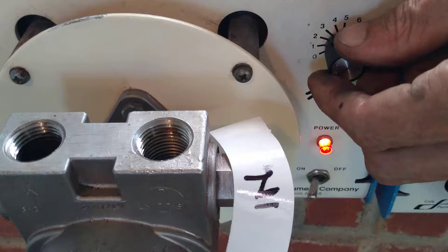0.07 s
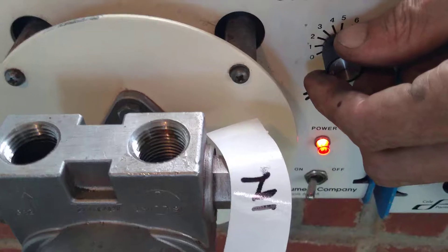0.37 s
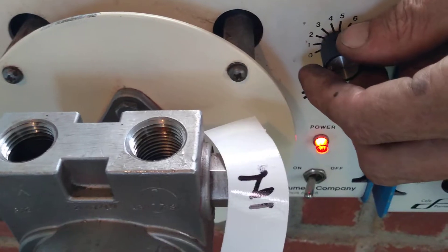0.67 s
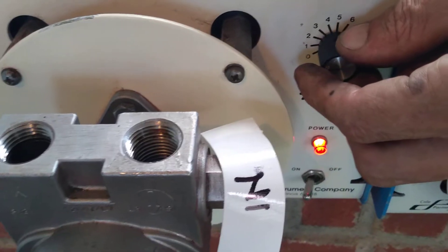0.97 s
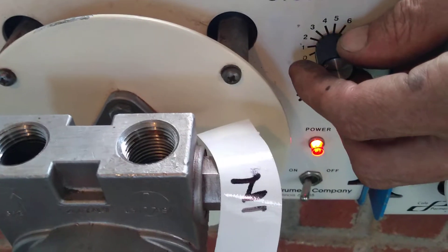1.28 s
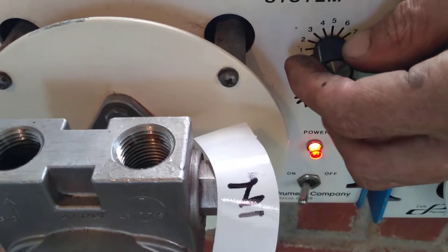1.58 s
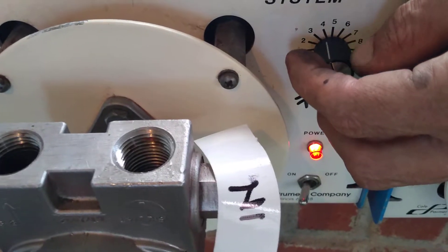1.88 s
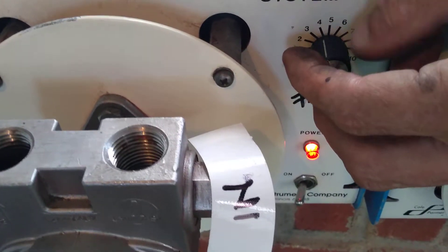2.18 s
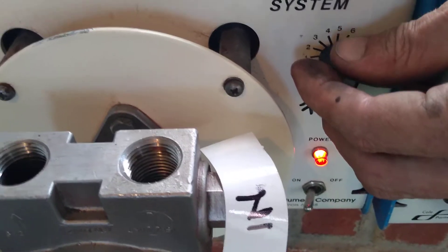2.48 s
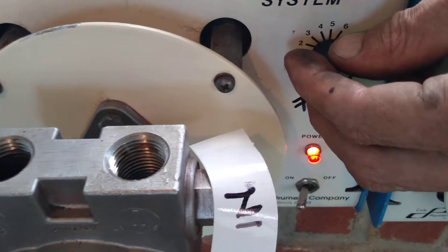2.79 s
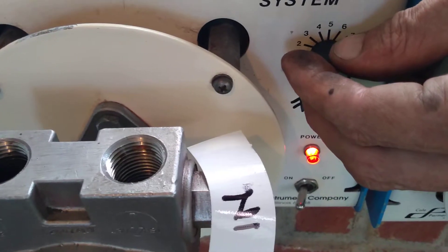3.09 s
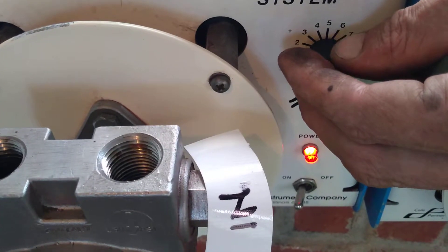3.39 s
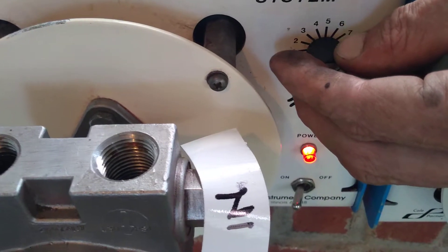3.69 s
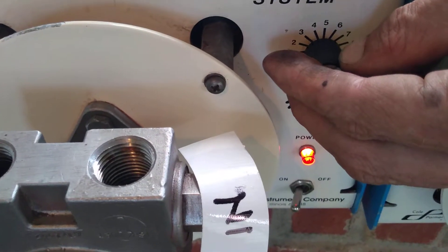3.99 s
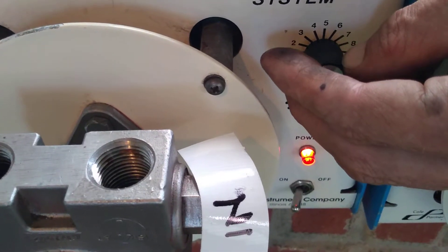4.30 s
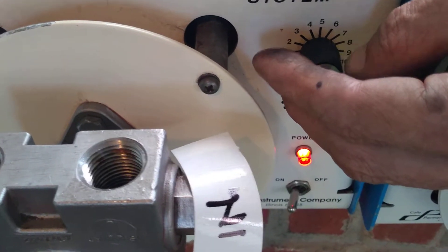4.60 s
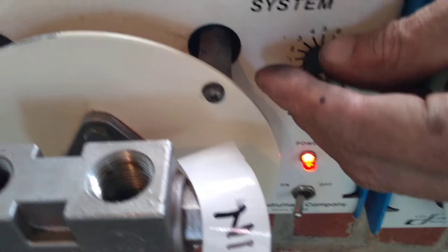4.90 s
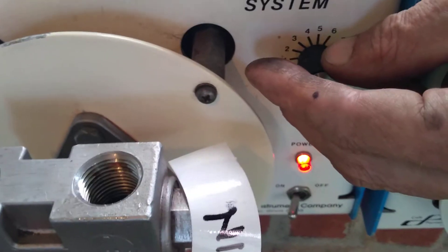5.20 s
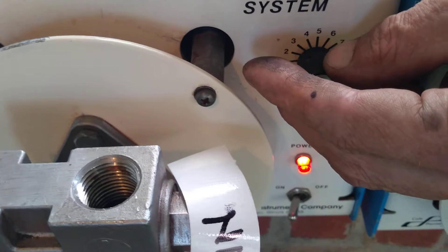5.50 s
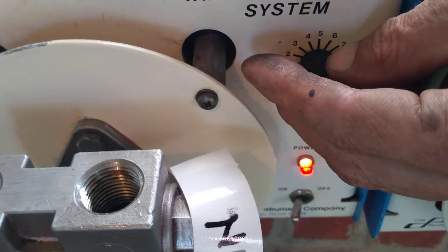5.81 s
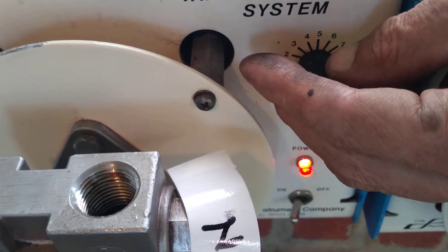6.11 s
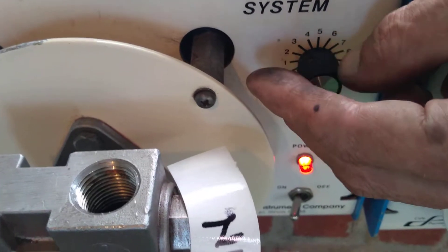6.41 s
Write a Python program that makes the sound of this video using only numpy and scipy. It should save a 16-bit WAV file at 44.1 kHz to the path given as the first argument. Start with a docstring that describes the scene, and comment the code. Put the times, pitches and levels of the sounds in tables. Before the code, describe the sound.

Heard up close in a workshop, a pump motor hums and buzzes, then slowly begins turning. Its rotor scrapes and chatters in the housing while the vanes tick, squeak briefly and knock against the casing. With rising speed the knocks thin out and the clicking becomes a fast, bright, louder mechanical rattle. A slight whine and a faint rumble from the bench lie underneath, and the pump keeps running.

```python
"""A small vane pump in a workshop, close by, while its speed dial is turned up.
The motor first hums on the chopped mains; the coupling bumps, the shaft creeps, then speeds up to
about 29 turns a second. The rotor rubs and chatters in its housing. The vanes click, crackle,
squeak and now and then knock the casing. At speed the armature slots whine; the bench rumbles below."""
import sys
import numpy as np
from scipy import signal
from scipy.fft import rfft, irfft
from scipy.io import wavfile
from scipy.ndimage import uniform_filter1d

SR = 44100
rng = np.random.default_rng(int(sys.argv[2]) if len(sys.argv) > 2 else 0)


def output_pcm(signal):
    """Save a mono or channel-first signal as 16-bit PCM at the path in sys.argv[1].

    Samples are clipped to [-1, 1] before scaling.
    """
    pcm = np.clip(np.atleast_2d(signal).T, -1, 1) * 32767
    wavfile.write(sys.argv[1], SR, np.round(pcm).astype(np.int16))


N = 293265
T = np.arange(N) / SR
HZ = np.fft.rfftfreq(N, 1 / SR)
HALF_SPEED_RPS, CRITICAL_RPS = 15, 8.74  # rps: shaft turns a second
ENGAGE_S = 1.042


def amp(db):
    return 10 ** (np.asarray(db) / 20)


def unit(x):
    return x / np.sqrt(np.mean(x ** 2) + 1e-20)


def steady(x):
    """Holds the slow level at 1."""
    return x / np.sqrt(uniform_filter1d((x ** 2).mean(0), 6000) + 1e-12)


def curve(rows, column=1, at=T):
    """A table column, interpolated over the first."""
    rows = np.array(rows)
    return np.interp(at, rows[:, 0], rows[:, column])


def spectrum(points):
    """A table interpolated over log frequency."""
    hz, value = np.transpose(points)
    return np.interp(np.log(HZ + 1), np.log(hz), value)


def add(mix, start_s, sound):
    part = mix[:, max(round(start_s * SR), 0):][:, :sound.shape[-1]]
    part += sound[..., :part.shape[1]]


def drift(rate_hz, size=32768):
    """Slow noise of rms 1."""
    hz = np.arange(size // 2 + 1) / T[-1]
    slow = irfft(rfft(rng.standard_normal(size)) / (1 + (hz / rate_hz) ** 4))
    return np.interp(T, np.linspace(0, T[-1], size), unit(slow))


def modes(rows, at=HZ):
    """Gain of resonances with steep skirts."""
    return np.sqrt(sum(amp(db) ** 2 / (1 + ((at - hz) / width) ** 2) ** 2 for hz, width, db in rows))


def colour(x, gain):
    """Minimum-phase filter that keeps the power of white noise."""
    cepstrum = irfft(np.log(np.maximum(unit(gain), 1e-4)), N)
    cepstrum[1:N // 2] *= 2
    cepstrum[N // 2:] = 0
    return irfft(rfft(x) * np.exp(rfft(cepstrum)), N)


def resonate(drive, rows, lifts_db):
    """Drives resonances; lifts_db maps a row index to its gain curve."""
    whole = modes(rows)
    body = colour(drive, whole)
    bins = rfft(body)
    return body + sum((amp(db) - 1) * irfft(bins * (modes([rows[i]]) / whole) ** 2, N)
                      for i, db in lifts_db.items())


# Shaft run-up: time_s, speed_rps
SHAFT_SPEED = [(1.0, 1.475), (2.0, 6.007), (3.0, 12.202), (3.5, 14.482), (4.0, 17.529), (4.5, 21.37),
               (4.75, 22.416), (5.0, 23.065), (5.25, 24.344), (5.5, 26.31), (6.0, 27.7), (6.3, 28.2),
               (6.66, 28.55)]
def shaft_rps(at=T):
    return curve(SHAFT_SPEED, at=at)


def shaft_turns():
    return np.cumsum(shaft_rps()) / SR


# Motor load, up as the rotor binds, down as it comes free: time_s, load_db
MOTOR_LOAD = [(.8, -13.5), (1.04, -4), (1.09, -2), (1.5, 0), (1.9, 1.5), (3.0, 0.5), (3.35, 0), (3.55, 2),
              (3.65, -0.5), (3.8, 0.94), (3.9, -3), (4.35, -1.5), (4.64, -1), (4.73, -4), (5.2, -1.5),
              (5.5, -1.5), (5.56, -4.5), (6.0, -1.5), (6.1, -3), (6.52, -2.5), (6.64, -1)]
def load_db():
    return curve(MOTOR_LOAD)


def mains_lines(rows, waver_db, spread_rad, chop_hz=120):
    """Wavering harmonics of the chopped mains; their phases are spread, softening the buzz's pulse."""
    out = np.zeros((2, N))
    shake = np.clip(shaft_rps() / CRITICAL_RPS, 0.6, 1)
    for harmonic, db, side_db, lead_rad in rows:
        k = round(harmonic)
        phase = 2 * np.pi * k * chop_hz * T + spread_rad * k ** 2 + 0.18 * shake * drift(11)
        tone = np.sqrt(2) * np.cos(phase + np.array([[0], [lead_rad]]))
        pan_db = side_db * np.array([[1], [-1]]) / 2
        out += tone * amp(db + waver_db * shake * drift(13) + pan_db)
    return out


# Hum of frame and panel: harmonic, level_db, left_minus_right_db, right_lead_rad
FRAME_HARMONICS = [(2, 1.5, 1.5, 1.4), (3, -11.5, -4, 1.12), (4, -24.5, 12, 1.2), (5, -18.5, -1, 1.1),
                   (6, -23.5, -4, 1.1), (7, -12, -1.5, 0), (8, -21, -8, 0)]
PANEL_HARMONICS = [(9, -13, 2, -6), (10, -18, 3, -6.5), (11, -28, -35, -3.5), (12, -25, 0, 0),
                   (13, -5, 0.5, 1), (14, -2, 3.5, 1), (15, -30.5, 24, -27), (16, -21.5, 7, -0.5)]
# Hum balance during run-up: time_s, frame_db, panel_db, stator_db
HUM_BALANCE = [(.12, -13, -32, -6), (.45, -6, -31, 4), (.78, -6.5, -15, 0), (.88, -11, -3.5, -2),
               (.96, -4, -5, -1), (1.05, -8.5, -6, -8), (1.07, 1.5, -2.5, -7), (1.22, -0.5, -1.5, -5),
               (1.33, 1, -1.5, -1), (1.5, -1.5, -2.5, -1.5), (1.75, -2, -0.5, -0.5), (3.0, 4.5, 0, 1),
               (4.0, 0, 6, 1), (4.6, 0.5, 2, 1.5), (6.1, 2, 2, 0.5)]
def hum():
    """The mains shakes stator, frame and panel: louder with load, fainter with speed."""
    stator = mains_lines([(1, 0.43, -5.5, 1.48)], waver_db=1.5, spread_rad=0)
    frame = mains_lines(FRAME_HARMONICS, waver_db=1.5, spread_rad=1.4)
    panel = mains_lines(PANEL_HARMONICS, waver_db=3, spread_rad=0.0787)
    stator *= amp(-49 - 0.27 * shaft_rps() + curve(HUM_BALANCE, 3))
    frame *= amp(-41 - 0.31 * shaft_rps() + curve(HUM_BALANCE, 1))
    panel *= amp(-48 - 0.6 * shaft_rps() + curve(HUM_BALANCE, 2))
    return (stator + frame + panel) * amp(load_db())


# Bench resonances: pitch_hz, width_hz, gain_db
BENCH_MODES = [(55.7, 3.8, -8), (90.8, 4.3, 0), (137, 48, -15.5)]
# Bench shaking: time_s, level_db
BENCH_LEVEL = [(0.1, -63), (0.46, -58), (1.5, -58), (3.0, -55.5), (6.65, -68)]
def rumble(gain_db=-0.5):
    """The bench shakes at its low resonances."""
    shaking = colour(rng.standard_normal((2, N)), modes(BENCH_MODES))
    return steady(shaking) * amp(curve(BENCH_LEVEL) + gain_db)


def microphone_hiss(level_db=-69.5, corner_hz=9000):
    """Faint bright self-noise of each port."""
    return colour(rng.standard_normal((2, N)), HZ / np.hypot(HZ, corner_hz)) * amp(level_db)


# Tight spot of each turn: time_s, angle_turns, swing_db
TIGHT_SPOT = [(1.5, 0.32, 11), (2, 0.17, 1), (2.6, 0.21, 0), (3.8, 0.38, 2.5), (4.8, 0.36, 4),
              (5.3, 0.27, -1.5), (5.55, 0.78, -1.5), (6.65, 0.76, 3)]
def tightness_db():
    """The contact tightens and eases once a turn."""
    return curve(TIGHT_SPOT, 2) * np.cos(2 * np.pi * (shaft_turns() - curve(TIGHT_SPOT)))


def friction(repeat_share, swing, grit_db, grain_hz, bumps_db, mark_count=512, bump_count=40):
    """Surface marks that return on each turn plus fresh grit, hardest at the tight spot."""
    turns = shaft_turns()
    moving = np.clip((T - 1.2) / 0.66, 0, 1)
    surface = rng.standard_normal(mark_count)
    surface = surface + 0.89 * np.roll(surface, mark_count // 2)  # opposite vanes pass the same marks
    height = np.interp(turns, np.arange(mark_count) / mark_count, surface, period=1)
    marks = np.diff(height, prepend=0)
    marks /= np.sqrt(uniform_filter1d(marks ** 2, 4096) + 1e-12)
    bump_heights = unit(rng.standard_normal(bump_count))
    bumps = np.interp(turns, np.arange(bump_count) / bump_count, bump_heights, period=1)
    force = amp(moving * (swing * tightness_db() + bumps_db * bumps + grit_db * drift(grain_hz)))
    force /= np.sqrt(uniform_filter1d(force ** 2, 6000))
    share = repeat_share * moving * shaft_rps() / max(rps for _, rps in SHAFT_SPEED)
    return force * (np.sqrt(1 - share) * rng.standard_normal((2, N)) + np.sqrt(share) * marks)


def rub_gain(half_speed_db, doubling_db, load_factor, idle_db):
    """Rubbing grows with speed and load, above a faint idle noise."""
    doublings = np.log2(shaft_rps() / HALF_SPEED_RPS)
    return np.hypot(amp(half_speed_db + doubling_db * doublings + load_factor * load_db()), amp(idle_db))


ROTOR_GAIN = rub_gain(half_speed_db=-42, doubling_db=6, load_factor=2, idle_db=-68.5)
CONTACT_GAIN = rub_gain(half_speed_db=-45.5, doubling_db=6.5, load_factor=1.7, idle_db=-68.5)

# Contact noise spectrum: frequency_hz, gain_db
CONTACT_SPECTRUM = [(4400, 4), (4950, 3), (5150, 5), (5650, 2.5), (6050, 3.5), (7300, 3.5), (8300, 0.5),
                    (8850, 2), (10300, -3), (11300, 0), (12600, -3.5), (14200, -7)]
def contact_colour(x, low_cut_hz=4300):
    """The bright tone of metal contact."""
    return colour(x, amp(spectrum(CONTACT_SPECTRUM)) / np.sqrt(1 + (low_cut_hz / (HZ + 1)) ** 16))


# Pump resonances: pitch_hz, width_hz, gain_db
BASE_MODES = [(200, 52, -9.5), (272, 73, -0.5), (426, 49, 2.5), (573.3, 46, 1.5), (717, 93, -1)]
CASING_MODES = [(932, 97, -5), (1006, 57, -0.5), (1103, 35, -3.5), (1231, 66, -8), (1510, 230, -15),
                (1628, 47, -4), (1820, 34, -4.5)]
ROTOR_MODES = [(2640, 1750, -22), (2456, 235, 0), (2700, 190, -14), (2842, 27, -1.5), (2975, 260, -5.5),
               (3229, 62, -1.5), (3510, 150, -5), (3787, 49, 2.5)]
# Resonance lift by speed: speed_rps, base_573hz_db, casing_1006hz_db, casing_1231hz_db
MODE_LIFTS = [(1.5, -5, -14.5, 1), (4.93, 0, 2, -1), (8.9, 0, 8.5, -4), (12.3, 6, -1, -1),
              (14.7, 7, -4, -1.5), (17.4, 6, -3, -0.5), (21.4, 8, -2, 2), (23.8, 6, -6.5, 4),
              (29.08, 1, -0.5, 8)]
def rubbing(critical_db=6, critical_width_rps=4.6):
    """The rubbing rotor shakes the base, the casing and itself, and hisses at the contact."""
    rps = shaft_rps()
    drive = friction(repeat_share=0.003, swing=0.5, grit_db=0, grain_hz=90, bumps_db=4.5, mark_count=64)
    base = steady(resonate(drive, BASE_MODES, {3: curve(MODE_LIFTS, 1, rps)}))
    base *= rub_gain(half_speed_db=-48.5, doubling_db=4, load_factor=2, idle_db=-62.5)

    drive = friction(repeat_share=0.02, swing=0.59, grit_db=0.5, grain_hz=110, bumps_db=2, mark_count=128)
    lifts_db = {1: curve(MODE_LIFTS, 2, rps), 3: curve(MODE_LIFTS, 3, rps)}
    casing = steady(resonate(drive, CASING_MODES, lifts_db))
    casing *= rub_gain(half_speed_db=-41.5, doubling_db=5.5, load_factor=1.5, idle_db=-66.5)
    casing *= amp(critical_db * np.exp(-((rps - CRITICAL_RPS) / critical_width_rps) ** 2))

    drive = friction(repeat_share=0.1, swing=0.41, grit_db=2, grain_hz=230, bumps_db=2.5)
    rotor = steady(colour(drive, modes(ROTOR_MODES))) * ROTOR_GAIN * amp(-2.5)

    drive = friction(repeat_share=0.014, swing=0.58, grit_db=-0.5, grain_hz=510, bumps_db=3)
    hiss = steady(contact_colour(drive)) * CONTACT_GAIN * amp(-3)
    return base + casing + rotor + hiss


def coupling_bump(level_db=-47, decay_s=0.014, rotor_db=-6):
    """The coupling takes up its slack and bumps the whole pump."""
    t = np.arange(5000) / SR
    bump = np.zeros((2, N))
    add(bump, ENGAGE_S, amp(level_db) * rng.standard_normal((2, len(t))) * np.exp(-t / decay_s))
    housing = colour(bump, modes(BASE_MODES)) + colour(bump, modes(CASING_MODES)) / 2
    return housing + amp(rotor_db) * colour(bump, modes(ROTOR_MODES))


def crackle(gain_db=-7, swing=1.4, per_turn=12, spread_db=3.6, tick_s=0.0002):
    """Vane tips catch on tiny burrs: random ticks, thickest at the tight spot."""
    onset = np.clip(shaft_rps() / CRITICAL_RPS, 0, 1) ** 2 * (T > ENGAGE_S)
    rate_hz = per_turn * shaft_rps() * amp(swing * tightness_db()) * onset
    hits = rng.random(N) < rate_hz / SR
    sizes = hits * amp(spread_db * np.minimum(rng.exponential(1, N), 3))
    envelope = signal.lfilter([1], [1, -np.exp(-1 / (tick_s * SR))], sizes)
    ticks = envelope * rng.standard_normal((2, N))
    return unit(contact_colour(ticks)) * CONTACT_GAIN * amp(gain_db)


def chirps(rows, gain_db, scatter):
    """A part vibrates for milliseconds at a wandering pitch."""
    t = np.arange(3500) / SR
    out = np.zeros((2, N))
    for start_s, db, hz, swell_s in rows:
        wander = unit(uniform_filter1d(rng.standard_normal((2, len(t))), 40))
        tone = np.sin(2 * np.pi * np.cumsum(hz * (1 + scatter * wander), axis=1) / SR)
        add(out, start_s, amp(db + gain_db) * tone * t / swell_s * np.exp(1 - t / swell_s))
    return out


def chatter(gain_db, speed_tilt_db, band_hz, swell_s, count):
    """A part sticks and slips: random chirps whose level follows the rubbing."""
    starts_s = rng.uniform(1.35, N / SR, count)
    levels_db = np.minimum(rng.exponential(1, count), 3)
    rows = zip(starts_s, levels_db, rng.uniform(*band_hz, count), np.full(count, swell_s))
    speed_db = speed_tilt_db * (shaft_rps() / HALF_SPEED_RPS - 0.5)
    return chirps(rows, gain_db, scatter=0.033) * ROTOR_GAIN * amp(speed_db)


# Vane catches: start_s, end_s, angle_turns, level_db
VANE_CATCHES = [(2.6, 3.75, 0.65, -34.5), (2.65, 3.7, 0.6, -37), (2.85, 3.8, 0.43, -42),
                (2.9, 4.7, 0.22, -52), (3.56, 3.8, 0.29, -35), (3.93, 4.26, 0.33, -42),
                (4.26, 5.45, 0.31, -32.5), (4.25, 4.82, 0.4, -35), (4.903, 6.65, 0.61, -38),
                (5.4, 6.65, 0.69, -30.5), (5.6, 6.15, 0.19, -42), (5.55, 6.65, 0.85, -35.5)]
def catch_clicks(max_turns=120, jitter_s=0.0007, spread_db=1.2, tilt_spread_db=2.5):
    """One click row each time the shaft passes an angle where a vane catches."""
    turns, rows = shaft_turns(), []
    for start_s, end_s, angle, db in VANE_CATCHES:
        late, hard, bright = rng.standard_normal((max_turns, 3)).T
        times_s = np.interp(np.arange(max_turns) + angle, turns, T) + jitter_s * late
        passes = zip(times_s, db + spread_db * hard, tilt_spread_db * bright)
        rows += [row for row in passes if start_s < row[0] < min(end_s, T[-300])]
    return rows


def decay(t, decay_s):
    return (t >= 0) * np.exp(-np.maximum(t, 0) / decay_s)


def vane_contact(t, rps, snap_s=0.0008, bounce_gap_s=0.0032, bounce_count=4):
    """A vane scrapes, snaps and bounces; more smear and bounce at speed."""
    scrape = amp(-16) * (t < 0) * np.exp(-abs(t) / 0.0058)
    tail = amp(-16) * decay(t, 0.038)
    delays_s = np.cumsum(rng.exponential(bounce_gap_s, bounce_count)) + snap_s
    sizes = amp(-6 - 2 * np.arange(bounce_count) + 3 * rng.uniform(-0.69, 1, bounce_count))
    bounces = np.sqrt(sum((size * decay(t - s, snap_s)) ** 2 for size, s in zip(sizes, delays_s)))
    smear = np.hypot(scrape + tail, 0.62 * bounces) * amp(5 * (rps / HALF_SPEED_RPS - 2))
    return (decay(t, snap_s) + smear) * rng.standard_normal((2, len(t)))


def vane_ping(t, gain_db=-11.5, decay_s=0.005, low_hz=4600, high_hz=12000, count=6):
    """A struck vane sings briefly at a few random pitches."""
    pitches_hz = low_hz * (high_hz / low_hz) ** rng.random(count)
    tones = sum(np.sin(2 * np.pi * (hz * t + rng.random((2, 1)))) for hz in pitches_hz)
    return amp(gain_db) * tones / np.sqrt(count) * decay(t, decay_s)


# Stray and extra hard clicks: start_s, level_db, tilt_db_per_octave
STRAY_CLICKS = [(1.365, -43, -7), (1.461, -42, 0), (1.496, -50, -9), (1.5354, -44, -8),
                (1.658, -33.5, -8.5), (1.711, -39, -5), (1.782, -46, -19), (1.841, -33.5, 1),
                (1.881, -36.5, -4), (1.9852, -39, 5), (2.0074, -31, -4), (2.0175, -35.5, -1),
                (2.1125, -37, 5), (2.131, -30.5, -4), (2.14, -34, -3), (2.2275, -35, 9), (2.255, -36, -4),
                (2.544, -42, -11), (2.643, -33, 6), (2.6905, -35.5, 0), (2.7605, -37, -2),
                (2.908, -37, -15), (2.9365, -31, 3), (2.957, -32.5, -1), (3.0995, -29, 6), (3.12, -31, 4),
                (3.1575, -30, 4), (3.2429, -27.5, -12), (3.253, -29, -3), (3.3855, -35, -11),
                (3.588, -29.5, 7), (3.7825, -32, 5), (3.798, -35, 4), (3.844, -29.5, 4), (3.903, -30, 1),
                (3.9905, -31, 2), (4.075, -32, 13), (4.1165, -37, 5), (4.2345, -35, 8), (4.336, -35, -2),
                (4.4455, -33, 3), (4.528, -30, -5), (4.551, -28, 0), (4.621, -28, -5), (4.665, -28, 8),
                (4.8, -31.5, 7), (4.8867, -35, 0), (5.061, -28, 6), (5.104, -29, 0), (5.1456, -25.5, 1),
                (5.1875, -29, 4), (5.3105, -29.5, 5), (5.43, -32, -1), (5.484, -27, 3), (5.522, -41, 11),
                (5.673, -33, 4), (5.926, -30, -8), (6.0385, -29, 3), (6.056, -33, 1), (6.1905, -29, -6),
                (6.2206, -25.5, -7), (6.289, -31, 2), (6.359, -28, 5)]
# Rotor's share of a click: speed_rps, gain_db
ROTOR_SHARE = [(4, -1), (10, -3), (22, -10), (28, -5.5)]
def clicks(ring_db=-2.5, ring_s=0.004, spot_db=1.8):
    """Vanes strike and ring the rotor; each lands on a different spot, with its own colour."""
    t = np.arange(-600, 2400) / SR
    octaves = np.log2(np.clip(np.fft.rfftfreq(len(t), 1 / SR), 5000, 12000) / 7500)
    snaps, rings = np.zeros((2, 2, N))
    for start_s, db, tilt_db in STRAY_CLICKS + catch_clicks():
        rps = shaft_rps(start_s)
        contact = vane_contact(t, rps)
        ring = rng.standard_normal((2, len(t))) * decay(t, ring_s)
        contact += vane_ping(t)
        ripple = unit(uniform_filter1d(rng.standard_normal(len(octaves)), 110))
        snap = irfft(rfft(contact) * amp(spot_db * ripple + tilt_db * octaves))
        add(snaps, start_s + t[0], amp(db) * snap)
        add(rings, start_s + t[0], amp(db + curve(ROTOR_SHARE, at=rps) + ring_db) * ring)
    return contact_colour(snaps) + colour(rings, modes(ROTOR_MODES))


# Vane squeaks: start_s, level_db, pitch_hz, swell_s
VANE_SQUEAKS = [(1.658, -11, 6000, 0.00069), (2.007, -23, 5030, .0013), (2.132, -16.5, 3100, 0.0019),
                (2.353, -23, 4840, 0.0011), (3.243, -30, 5100, .0015), (3.2435, -28, 3850, 0.00084),
                (4.621, -19, 2860, 0.0017), (6.2205, -8.5, 4950, 0.00083)]
def squeaks():
    """A sticking vane squeaks briefly."""
    return chirps(VANE_SQUEAKS, gain_db=-19, scatter=0.106)


# Casing knocks: start_s, level_db, pitch_hz, swell_s
CASING_KNOCKS = [(1.825, -35.5, 1070, 0.0028), (1.985, -36, 1050, 0.0023), (2.005, -32.5, 940, 0.003),
                 (2.112, -33, 1010, .0022), (2.131, -27, 1047, 0.004), (2.185, -30.5, 950, 0.0022),
                 (2.241, -28, 950, 0.0035), (2.352, -25, 998, 0.0044), (2.417, -33, 980, 0.0034),
                 (2.455, -41, 980, 0.0029), (2.549, -35, 1056, 0.0033), (2.63, -33, 1030, .0028),
                 (2.8, -30, 983, 0.004), (2.906, -30, 1020, 0.0026), (2.927, -22.5, 1014, .0027),
                 (2.977, -28, 1013, .011), (3.166, -28, 1070, 0.002), (3.2414, -21.5, 1030, 0.0024),
                 (3.386, -33, 1050, 0.0032), (3.479, -29, 1090, 0.0017), (3.521, -35, 1070, 0.0028),
                 (3.798, -39, 1020, 0.0022), (3.82, -43, 1060, 0.0018), (4.123, -37.5, 1100, 0.0029),
                 (4.544, -36, 1080, .002), (5.505, -35, 1080, 0.0022), (4.618, -33, 950, 0.0034),
                 (4.887, -38, 1140, 0.0018), (6.218, -46, 910, 0.0021)]
def knocks(casing_db=-10, base_db=-12, blow_s=0.0021):
    """A short blow shakes casing and base, then chatters at the casing's pitch."""
    t = np.arange(1500) / SR
    blows = np.zeros((2, N))
    for start_s, db, _, _ in CASING_KNOCKS:
        add(blows, start_s, amp(db) * rng.standard_normal((2, len(t))) * decay(t, blow_s))
    casing = amp(casing_db) * colour(blows, modes(CASING_MODES))
    base = amp(base_db) * colour(blows, modes(BASE_MODES[3:]))
    return casing + base + chirps(CASING_KNOCKS, gain_db=0, scatter=0.03)


# Resonances driven by the slots: shaft_multiple, pitch_hz, width_hz, level_db
SLOT_MODES = [(16, 344, 11, -48), (16, 400, 18, -49), (16, 436, 14, -45), (19, 537, 7, -51),
              (20, 555, 14, -53), (24, 572, 14, -51.5), (24, 672, 20, -53), (28, 570, 9, -56),
              (28, 614, 16, -49.5), (28, 686, 24, -50.5), (28, 772, 34, -52), (32, 424, 32, -44),
              (32, 575, 26, -38.5), (32, 868, 10, -43), (32, 910, 14, -43.5)]
def whine(judder_rad=0.006, judder_hz=20, flutter_db=1.5):
    """Armature slots sing on multiples of the shaft speed, each swelling as it crosses a resonance."""
    angle = 2 * np.pi * shaft_turns() + judder_rad * drift(judder_hz)  # rubbing makes the shaft judder
    tones = np.zeros(N)
    for multiple in sorted({row[0] for row in SLOT_MODES}):
        swell = modes([row[1:] for row in SLOT_MODES if row[0] == multiple], multiple * shaft_rps())
        tones += np.sin(multiple * angle) * swell * amp(flutter_db * drift(judder_hz))
    return tones * amp(load_db()) * np.array([[1], [0]])  # common channel of ports()


# Likeness of the microphone ports: frequency_hz, coherence
PORT_COHERENCE = [(90, 0.47), (420, 0.89), (520, 0.58), (700, 0.9), (1100, 0.95), (1370, 0.36),
                  (1700, 0.59), (2050, 0.97), (2450, 0.53), (3000, 0.97), (3550, 0.62), (4100, 0.93),
                  (4600, 0.42), (7000, 0.51), (12000, 0.27)]
# Port balance: frequency_hz, left_minus_right_db
PORT_BALANCE = [(90, 2.5), (250, 5.5), (430, -6), (580, -9), (800, -1), (1100, 0), (1330, 8), (1700, 0.5),
                (2100, 1), (3000, -0.5), (5000, -2), (7500, -1.5), (10000, -5), (14000, -4)]
def ports(x, lead_from_hz=1030, half_turn_hz=1030):
    """Two ports on a small body hear partly alike; the right one leads in the treble."""
    common, separate = rfft(x)
    coherence = np.clip(spectrum(PORT_COHERENCE), 0, 1)
    lead_rad = np.pi * np.maximum(HZ - lead_from_hz, 0) / half_turn_hz
    lead_rad -= np.sin(2 * lead_rad) / 2
    right = coherence * common * np.exp(1j * lead_rad) + np.sqrt(1 - coherence ** 2) * separate
    side = amp(spectrum(PORT_BALANCE) / 2)
    return irfft(np.array([common * side, right / side]), N)


def scene():
    """Hum, rubbing and clatter of the pump at the two ports."""
    squeaking = squeaks()
    rotor = chatter(gain_db=1.5, speed_tilt_db=-2.5, band_hz=(2404, 3120), swell_s=0.0022, count=170)
    vanes = chatter(gain_db=-5, speed_tilt_db=1, band_hz=(4700, 7500), swell_s=0.0016, count=320)
    clatter = squeaking + rotor + vanes + knocks() + coupling_bump() + clicks() + crackle()
    return hum() + ports(rubbing() + clatter + whine() + rumble()) + microphone_hiss()


def record(dry, start_s=0.105, fade_s=0.41, cutoff_hz=14250):
    """Fade-in, then low-pass."""
    faded = dry * np.clip((T - start_s) / fade_s, 0, 1) ** 0.66
    low_pass = signal.firwin(301, cutoff_hz, window=("kaiser", 8), fs=SR)
    return signal.oaconvolve(faded, low_pass[None], "same", axes=1)


dry = scene()
out = record(dry)
output_pcm(out)
```